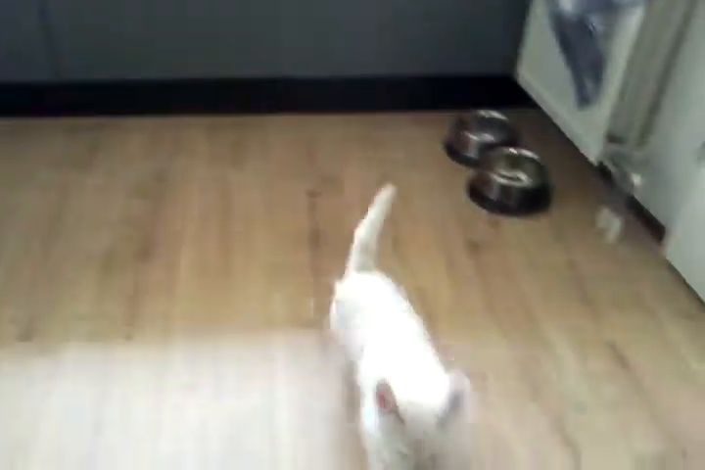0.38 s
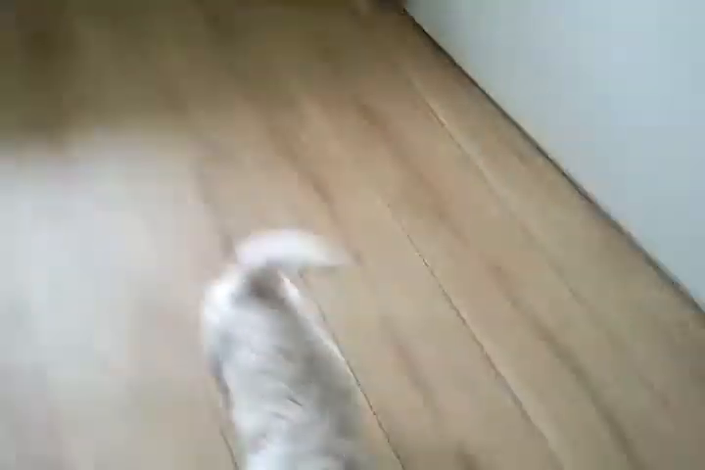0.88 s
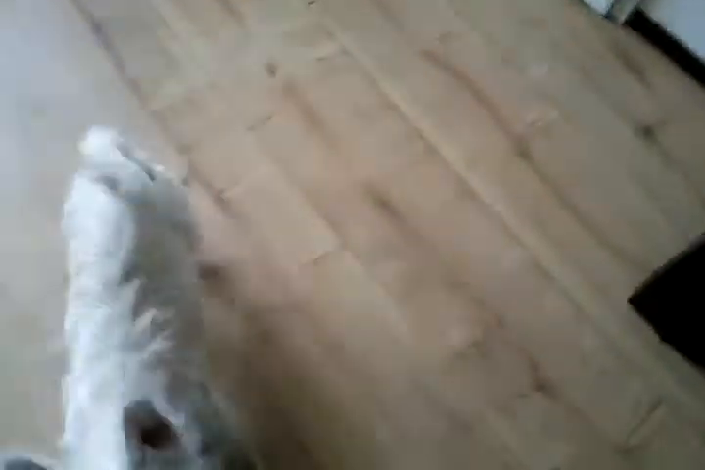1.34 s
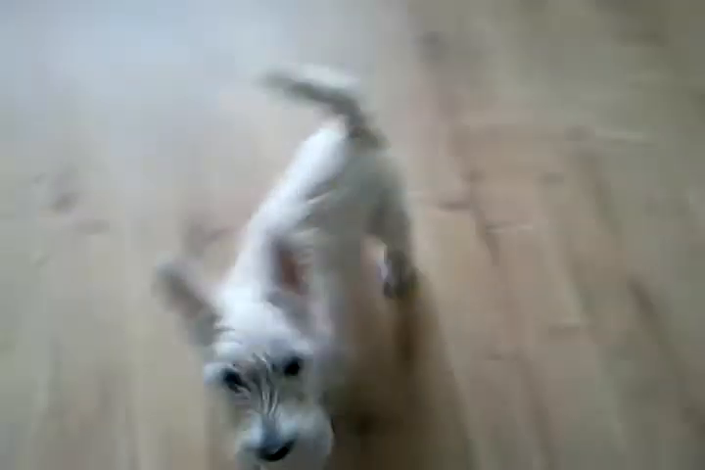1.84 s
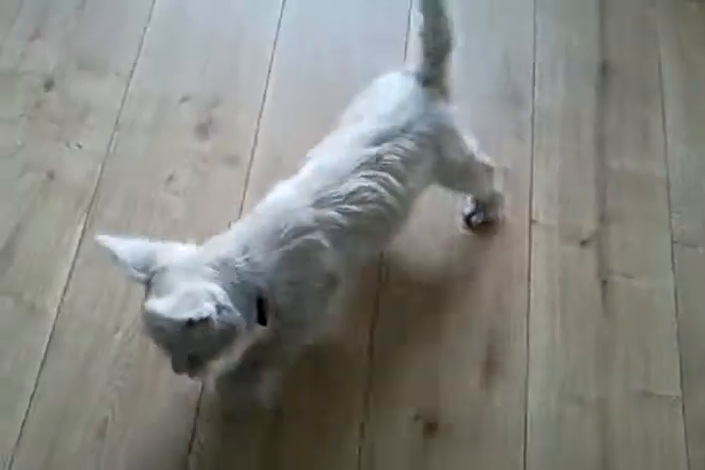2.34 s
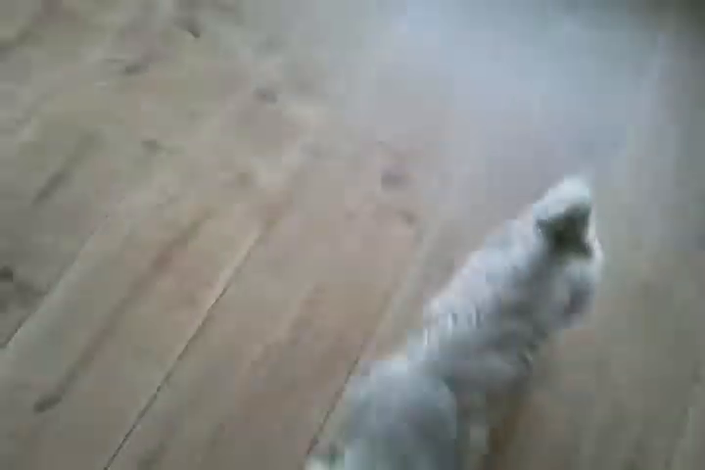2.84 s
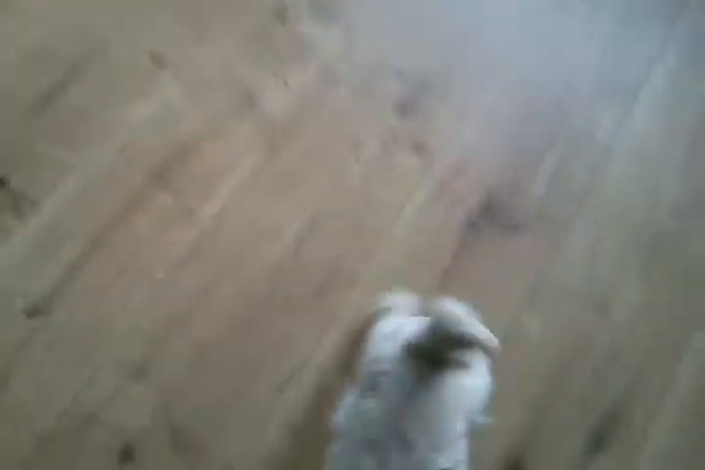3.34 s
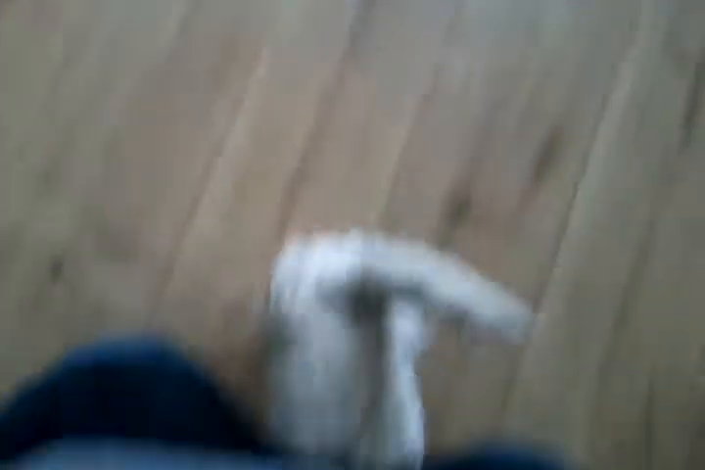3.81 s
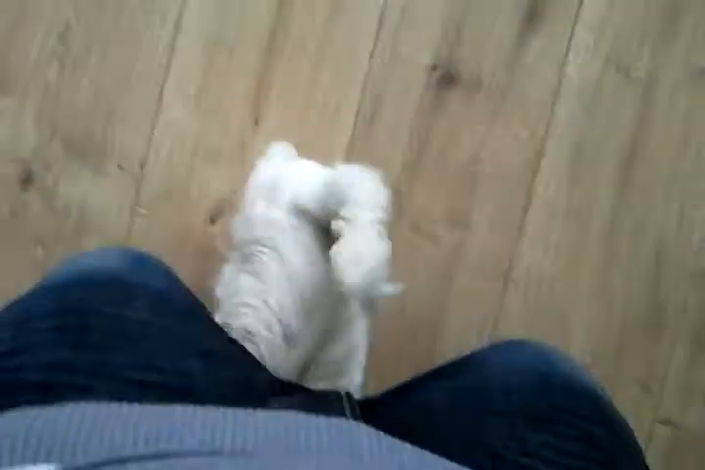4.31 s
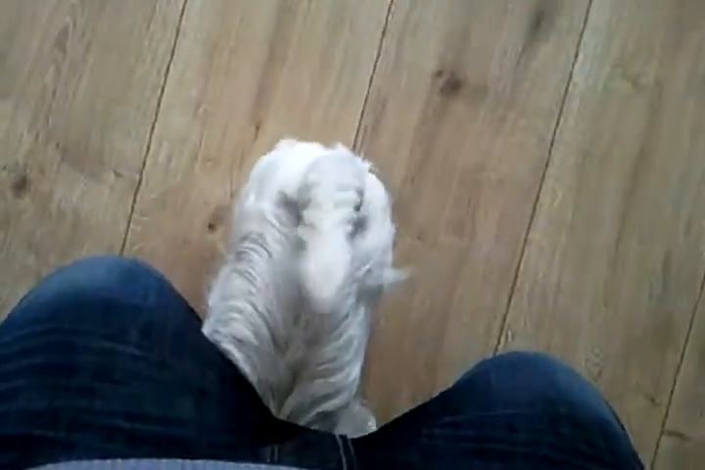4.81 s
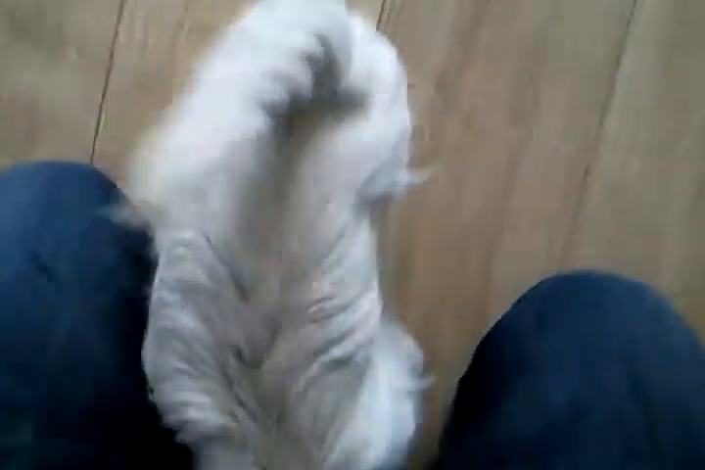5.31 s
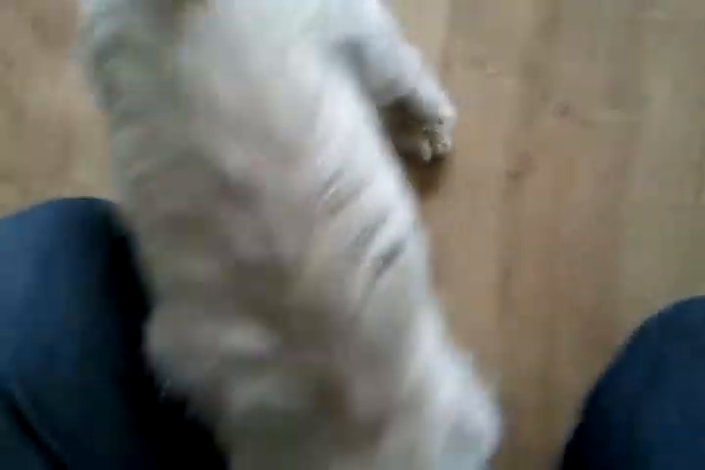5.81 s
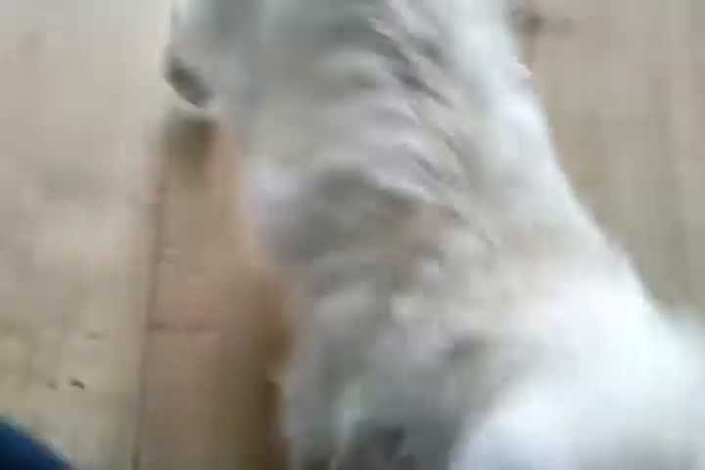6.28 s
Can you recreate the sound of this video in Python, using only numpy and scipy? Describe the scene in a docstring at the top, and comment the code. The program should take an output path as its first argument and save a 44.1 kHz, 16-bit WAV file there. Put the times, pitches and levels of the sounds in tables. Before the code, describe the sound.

Small dog moving on a hard wood floor: clicking claws, dull pad thuds, short woody knocks, and continuous soft rubbing of paws and fur. It starts with a rattling hollow knock and a tiny whimper, scurries busily, pauses, knocks and scuffles again, then thumps close under the microphone. The bare room rings briefly; low hiss throughout, no bright treble.

```python
"""A puppy on a hard wooden kitchen floor near a phone microphone, in mono under a soft steady hiss.
A hollow knock and scrapes open; others recur, over a continuous scuffing of fur and paws made of friction slips.
Paw falls run throughout: pads thud, boards knock, claws tick, as damped modes. Faint tones sound early and late,
one soft whimper near 0.4 s. From 4.8 s the paws fall right below the microphone. The bare room rings for about
half a second through sparse decaying reflections, and nothing lies above 9 kHz."""
import sys
import numpy as np
from scipy import signal
from scipy.fft import rfft, irfft
from scipy.io import wavfile
from scipy.ndimage import uniform_filter1d

SR = 44100
rng = np.random.default_rng(int(sys.argv[2]) if len(sys.argv) > 2 else 0)


def convert_level_to_amplitude(level_db):
    """Map a level in decibels to its linear amplitude factor."""
    exponent = np.asarray(level_db, float) / 20
    return 10 ** exponent


def persist_wave(psi):
    """Save psi, clipped to +-1, as 16-bit WAV."""
    counts = np.round(np.clip(psi, -1, 1) * 32767).astype(np.int16)
    wavfile.write(sys.argv[1], SR, np.atleast_2d(counts).T)


N = 293703

# spectrum of room tone and microphone noise, relative: freq_hz, density_db
HISS_SPECTRUM = [(18, -44.5), (30, 6), (150, -1), (330, 7), (590, -25.5), (840, -4), (1500, -8.5),
                 (2300, -5), (2800, -12), (6700, -4), (8700, -13)]
# how busily the puppy scuffs about: time_s, level_db
SCUFF_LEVELS = [(0.29, -54), (0.87, -57.5), (1.47, -64.5), (3.229, -63), (3.378, -48), (3.72, -48),
                (3.96, -53.5), (4.341, -47.5), (4.5, -58.5), (4.77, -55), (5.33, -54), (5.79, -57.5),
                (6.12, -57), (6.3, -47), (6.66, -54.5)]
# spectrum of one slip of a dragging paw, relative: freq_hz, gain_db
DRAG_SPECTRUM = [(120, -13), (250, -4), (380, -0.5), (600, -5.5), (850, -6.5), (1200, -10.5), (1800, -22)]
# spectrum of one slip of fur and cloth, relative: freq_hz, gain_db
RUSTLE_SPECTRUM = [(600, -36), (1400, -4), (2300, 3.5), (2900, -2.5), (4300, -2.5), (5300, -5),
                   (7000, -7.5), (9000, -37.5)]
# hard knocks: start_s, blow_db, low_modes_db, pitch_factor (by where it lands),
# rebound_delay_s, rebound_db (against the blow)
KNOCKS = [(.001, -10, -10, 0.93, 0.021, -13), (2.583, -14, -9, 0.96, .0101, -14),
          (3.1789, -15.5, -6.5, 0.88, 0.023, -7.5), (3.543, -19.5, -4, 0.92, 0.023, -2),
          (4.2738, -11, -4, 0.95, .018, -3), (4.5795, -16, -4.5, 0.94, 0.021, -4)]
# heavily damped modes of the knocked hollow thing, before the pitch factor: mode_hz, level_db, t60_s
HOLLOW_MODES = [(325, -11, 0.019), (494, 2, 0.029), (582, -2, 0.035), (950, -18, 0.0037), (1091, 8, 0.01),
                (1357, -1.5, 0.009), (1548, -6, 0.016), (1810, -8.5, 0.016), (3135, -14.5, 0.0096)]
# spectrum of a claw slipping on board, relative: freq_hz, gain_db
CRACK_SPECTRUM = [(400, -13.5), (1200, -13), (2250, 9.5), (2800, 6), (3400, 7), (4600, 4), (7000, 1.5),
                  (9000, -9)]
# scrapes and slides, short and long: start_s, length_s, level_db, brightest_hz,
# breadth_octaves (limited on use)
SCRAPES = [(.01, .17, -43, 5200, 1.0), (0.16, 0.14, -49.5, 5200, 1.0), (0.597, 0.31, -52, 4500, 1),
           (0.829, 0.11, -56.5, 937, 0.23), (1.126, 0.1, -52.5, 4970, 1), (1.948, 0.15, -57, 2410, 1),
           (2.861, 0.18, -61, 6080, 0.17), (3.414, 0.27, -53, 3410, 0.26), (3.76, 0.23, -49, 820, .27),
           (4.025, 0.2, -56.5, 4270, 0.27), (4.059, 0.18, -54.5, 2200, 0.32), (5, 0.083, -52.5, 1170, 0.17),
           (5.086, 0.18, -47, 500, 1), (5.333, 0.075, -52, 2910, 1), (5.391, 0.015, -49.5, 3280, 0.36),
           (6.168, 0.25, -52.5, 2370, 1), (6.398, .3, -60.5, 2220, 0.61)]
# paw falls: start_s, claw_tick_db, pad_thud_db, board_knock_db, board_hz
PAW_FALLS = [(0.253, -43, -27.5, -28, 714), (0.4888, -44, -48, -26.5, 735),
             (0.5606, -35.5, -33.5, -43.5, 221), (0.607, -51, -37, -24.5, 855), (0.806, -60, -56, -36, 413),
             (0.8781, -36, -41, -24.5, 937), (0.886, -54, -30.5, -42, 414), (0.922, -33, -35, -28.5, 845),
             (1.1284, -43, -40, -33, 860), (1.4057, -40.5, -41, -32, 730), (1.4334, -34, -33.5, -28, 990),
             (1.6372, -46.5, -59, -23.5, 736), (1.697, -42.5, -45, -37, 900),
             (1.7189, -32.5, -38.5, -28, 1020), (1.7605, -33.5, -29.5, -21, 652),
             (1.8118, -42, -59, -31.5, 940), (1.9494, -40.5, -40, -28, 880), (1.959, -34.5, -56, -37, 840),
             (1.9844, -29.5, -30, -23, 950), (1.9965, -35, -37, -28.5, 1040),
             (2.0268, -35.5, -31, -19.5, 800), (2.045, -52, -43, -28, 830), (2.1786, -66, -42, -31.5, 930),
             (2.2449, -33, -44, -33, 920), (2.2526, -22.5, -31.5, -18, 886), (2.3454, -60, -57, -26.5, 807),
             (2.9205, -40, -50, -32, 890), (2.9546, -41, -40, -29.5, 914), (3.601, -34.5, -29, -20, 950),
             (3.694, -33, -23, -21.5, 826), (3.751, -37, -28, -26.5, 570), (3.7745, -38.5, -32, -22, 800),
             (4.9014, -45, -48, -28.5, 740), (4.9265, -44, -55, -26, 746), (5.0205, -40.5, -23, -33, 298),
             (5.0682, -37.5, -24.5, -26, 840), (5.1765, -32, -20.5, -13, 980),
             (5.3262, -63, -24, -33, 1040), (5.4518, -30, -21.5, -20, 990),
             (5.5663, -36.5, -20.5, -26.5, 954), (5.575, -49, -25.5, -25.5, 1000),
             (5.8324, -40.5, -36, -33.5, 810), (5.8714, -41.5, -31.5, -38, 816),
             (6.2195, -35, -35, -26.5, 860), (6.337, -64, -48, -32, 397), (6.362, -59.5, -46, -38, 348),
             (6.392, -46, -49, -32, 402), (6.472, -40.5, -58, -38, 353)]
# modes of claw tip and lacquer, before detuning: mode_hz, level_db, t60_s
CLAW_MODES = [(1470, -13.5, 0.0025), (2117, 2.5, 0.0066), (3285, -9, 0.015)]
# faint wavering tones: start_s, length_s, mean_hz, level_db (rms at the top of the swell)
TONES = [(0.327, 0.12, 985, -52), (1.13, 0.46, 679, -67), (5.669, 0.64, 318, -61.5)]
# harmonics of the whimper: multiple_of_fundamental, level_db
WHIMPER_HARMONICS = [(1, 2), (2, -12), (4, -6), (5, -12), (7, -12)]
# decay of the room's reflections: freq_hz, t60_s
KITCHEN_DECAY = [(200, 0.38), (500, 0.52), (1400, 0.47), (4000, 0.54), (8000, 0.37)]
# near surfaces that answer first: delay_s, echo_db
WALL_ECHOES = [(.0042, -14), (.0146, -9.5)]

HISS_DB = -60
RUSTLE_DB = -2.5  # fur and cloth against the dragging paws
RATTLE_DB, REBOUND_RATTLE_DB, REBOUND_PITCH_FACTOR = -12.5, -26, 1.012
SETTLE_GAP_S, SETTLE_DB_PER_S = 0.024, -170  # rocking to rest after the rebound: mean gap, loss
UNDERFOOT_S = 4.8  # from here on the puppy is right below the microphone
PAD_FAR_HZ, PAD_NEAR_HZ = 353, 442  # before detuning; higher right below the microphone
SKID_FAR_DB, SKID_NEAR_DB = -1, -7.5  # skid against the tick
OVERTONE_RATIO, OVERTONE_DB = 1.563, -11  # the board's next mode
TOE_SPREAD_S, TOE_DB = 0.018, -7  # two more toes land within this time
WHIMPER_START_S, WHIMPER_LENGTH_S, WHIMPER_DB = 0.37, 0.17, -54
WHIMPER_HZ, WHIMPER_RISE_HZ_PER_S = 330, 160
BUILD_S = 0.0058  # the reflections take this long to gather
EARLY_DB, EARLY_S = 4, 0.053  # extra strength of the first reflections, and how soon it fades


def evened(x):
    """Normalization: scales a signal to rms 1."""
    return x / np.sqrt(np.mean(x ** 2) + 1e-20)


def read(points, hz):
    """Interpolation of a spectrum or decay table on a logarithmic frequency axis."""
    freq_hz, value = np.transpose(points)
    return np.interp(np.log(hz + 1), np.log(freq_hz + 1), value)


def add(mix, start_s, sound):
    """Superposition: adds a sound into the mix from its start time."""
    part = mix[max(round(start_s * SR), 0):][:len(sound)]
    part += sound[:len(part)]


def click(points):
    """Minimum phase: the causal pulse of a given spectrum, its energy early, scaled to peak 1."""
    log_gain = read(points, abs(np.fft.fftfreq(2048, 1 / SR))) * np.log(10) / 20
    response = np.exp(np.conj(signal.hilbert(log_gain)))
    pulse = np.fft.ifft(response).real[:1024]
    return pulse / abs(pulse).max()


def ring(hz, t60_s, rise_s=0.0014):
    """Damped resonance: one mode decays exponentially after a soft start."""
    t = np.arange(8192) / SR
    decay = convert_level_to_amplitude(-60 * t / t60_s)
    return np.sin(2 * np.pi * hz * t) * decay * (1 - np.exp(-t / rise_s))


def scratch(length_s, count, slip_per_s):
    """Stick-slip: a hard tip lands (count sure slips), then skids in a dying cluster of uneven slips."""
    size = round(length_s * SR)
    progress = np.arange(size) / (length_s * SR)
    happens = rng.random(size) < slip_per_s / SR
    slips = rng.standard_normal(size) * happens * np.exp(-3.0 * progress)
    slips[:count] = 1
    return signal.oaconvolve(slips, click(CRACK_SPECTRUM))


def kitchen(x, wet_db, count=4):
    """Reverberation: two near echoes and sparse reflections decaying by band, in a turning blend of tails."""
    length = SR * 3 // 4
    taps = np.zeros((count, length))
    # one reflection of random sign in every 20 samples
    at = np.arange(130, length - 20, 20) + rng.integers(0, 20, (count, (length - 131) // 20))
    np.put_along_axis(taps, at, rng.choice([-1., 1.], at.shape), 1)
    hz, t, z = signal.stft(taps, SR, nperseg=256)
    decay = convert_level_to_amplitude(-60 * t / read(KITCHEN_DECAY, hz)[:, None])
    tails = signal.istft(z * decay, SR, nperseg=256)[1]
    age_s = np.arange(tails.shape[1]) / SR
    tails *= 1 - np.exp(-(age_s / BUILD_S) ** 2)
    tails *= convert_level_to_amplitude(EARLY_DB * np.exp(-age_s / EARLY_S))
    # the sound crossfades from tail to tail every 0.31 s
    turn = np.arange(N) / SR / 0.31 - np.arange(count)[:, None]
    distance = abs((turn + count / 2) % count - count / 2)
    share = np.cos(np.pi / 2 * np.minimum(distance, 1))
    wet = signal.oaconvolve(x * share, tails / np.linalg.norm(tails[0]), axes=1)[:, :N].sum(0)
    heard = x + convert_level_to_amplitude(wet_db) * wet
    for delay_s, echo_db in WALL_ECHOES:
        add(heard, delay_s, convert_level_to_amplitude(echo_db) * x)
    return heard


def hiss():
    """Stationary noise: Gaussian noise filtered to the spectrum of room tone and microphone noise."""
    hz = np.fft.rfftfreq(N, 1 / SR)
    spectrum = rfft(rng.standard_normal(N)) * convert_level_to_amplitude(read(HISS_SPECTRUM, hz))
    return convert_level_to_amplitude(HISS_DB) * evened(irfft(spectrum, N))


def friction(spectrum, slip_per_s, spread_db):
    """Stick-slip friction: uneven random slips in clumps, each exciting the same pulse, in the room."""
    clumps_db = 3 * evened(uniform_filter1d(rng.standard_normal(N), 1200))
    slips = rng.standard_normal(N) * (rng.random(N) < slip_per_s / SR)
    slips *= convert_level_to_amplitude(spread_db * np.minimum(rng.exponential(1, N), 4) + clumps_db)
    return evened(kitchen(signal.oaconvolve(slips, click(spectrum))[:N], wet_db=-1.5))


def scuffs():
    """Friction of two surfaces: dragging paws and rustling fur follow one course of activity."""
    busy = convert_level_to_amplitude(np.interp(np.arange(N) / SR, *np.transpose(SCUFF_LEVELS)))
    drag = friction(DRAG_SPECTRUM, slip_per_s=1500, spread_db=2.2)
    rustle = friction(RUSTLE_SPECTRUM, slip_per_s=3000, spread_db=2.5)
    return busy * (drag + convert_level_to_amplitude(RUSTLE_DB) * rustle)


def knocks():
    """Impact excitation: each blow, its rebound and the rocking after it ring every mode and rattle."""
    out = np.zeros(N)
    spot_db = rng.standard_normal((len(KNOCKS), 5, len(HOLLOW_MODES)))  # each impact excites the modes unevenly
    gaps = rng.uniform(0.6, 1.4, (len(KNOCKS), 3))
    for knock, spots, gap in zip(KNOCKS, spot_db, gaps):
        start_s, blow_db, low_db, pitch, rebound_s, rebound_db = knock
        blows = [(start_s, blow_db, RATTLE_DB, pitch)]
        # the rebound itself, then three rocks
        for later_s in np.cumsum([0, *(SETTLE_GAP_S * gap)]):
            level_db = blow_db + rebound_db + SETTLE_DB_PER_S * later_s
            at_s = start_s + rebound_s + later_s
            blows.append((at_s, level_db, REBOUND_RATTLE_DB, pitch * REBOUND_PITCH_FACTOR))
        for (at_s, level_db, rattle_db, shift), spot_row in zip(blows, spots):
            rattle = scratch(0.024, count=0, slip_per_s=9000)
            add(out, at_s, convert_level_to_amplitude(level_db + rattle_db) * rattle)
            for (hz, mode_db, t60_s), spot in zip(HOLLOW_MODES, spot_row):
                gain = convert_level_to_amplitude(level_db + mode_db + spot + low_db * (hz < 700))
                add(out, at_s, gain * ring(hz * shift, t60_s, rise_s=0.00043))
    # a small thing radiates little bass
    out = signal.sosfilt(signal.butter(4, 255, "high", fs=SR, output="sos"), out)
    return kitchen(out, wet_db=2.0)


def scrapes():
    """Sustained friction: dense slips under a smooth stroke, with one resonance, narrow or broad by row."""
    out = np.zeros(N)
    for start_s, length_s, level_db, hz, octaves in SCRAPES:
        wide = 2 ** np.clip(octaves, 0.12, 1.2)
        colour = [(hz / wide ** 4, -30), (hz / wide, -8), (hz, 0), (hz * wide, -8), (hz * wide ** 4, -28)]
        size = round(length_s * SR)
        slips = rng.standard_normal(size) * (rng.random(size) < 3000 / SR)
        slips *= signal.windows.tukey(size, 0.6)
        add(out, start_s, convert_level_to_amplitude(level_db) * evened(signal.oaconvolve(slips, click(colour))))
    return kitchen(out, wet_db=-9.0)


def paws():
    """Modal impact: a paw fall is a claw tick and skid, a dull pad thud and a short knock of the board."""
    far, near = np.zeros((2, N))
    detune = rng.uniform(0.94, 1.06, (len(PAW_FALLS), len(CLAW_MODES) + 1))
    toes = rng.random((len(PAW_FALLS), 2, 2))
    for paw_fall, (pad_shift, *claw_shifts), late_toes in zip(PAW_FALLS, detune, toes):
        start_s, claw_db, pad_db, board_db, board_hz = paw_fall
        out, skid_db, pad_hz = far, SKID_FAR_DB, PAD_FAR_HZ
        if start_s > UNDERFOOT_S:
            out, skid_db, pad_hz = near, SKID_NEAR_DB, PAD_NEAR_HZ
        skid = scratch(0.023, count=1, slip_per_s=1900)
        add(out, start_s, convert_level_to_amplitude(claw_db + skid_db) * skid)
        for (hz, mode_db, t60_s), shift in zip(CLAW_MODES, claw_shifts):
            add(out, start_s, convert_level_to_amplitude(claw_db + mode_db) * ring(hz * shift, t60_s, rise_s=0.0002))
        add(out, start_s, convert_level_to_amplitude(pad_db) * ring(pad_hz * pad_shift, 0.021))
        # the board always decays over the same number of cycles
        add(out, start_s, convert_level_to_amplitude(board_db) * ring(board_hz, 12.9 / board_hz, rise_s=0.0017))
        for delay, place in late_toes:
            toe = ring(board_hz * (1 + 0.59 * (place - 0.5)), 0.016)
            add(out, start_s + TOE_SPREAD_S * delay, convert_level_to_amplitude(board_db + TOE_DB) * toe)
        add(out, start_s, convert_level_to_amplitude(board_db + OVERTONE_DB) * ring(board_hz * OVERTONE_RATIO, 0.01))
    # less room up close
    return kitchen(far, wet_db=-3.5) + kitchen(near, wet_db=-5)


def tones():
    """Frequency modulation: soft sinusoids swell and fade on a slowly wavering pitch."""
    out = np.zeros(N)
    for start_s, length_s, hz, level_db in TONES:
        size = round(length_s * SR)
        waver = 0.0064 * evened(uniform_filter1d(rng.standard_normal(size), 1500))
        tone = np.sin(2 * np.pi * np.cumsum(hz * (1 + waver)) / SR)
        add(out, start_s, convert_level_to_amplitude(level_db) * np.sqrt(2) * np.hanning(size) * tone)
    return out


def whimper():
    """Harmonic series: a few partials on an unsteady, rising fundamental swell, hold and fade."""
    out = np.zeros(N)
    t = np.arange(0, WHIMPER_LENGTH_S, 1 / SR)
    waver = 0.005 * evened(uniform_filter1d(rng.standard_normal(len(t)), 600))
    turns = np.cumsum((WHIMPER_HZ + WHIMPER_RISE_HZ_PER_S * t) * (1 + waver)) / SR
    voice = sum(convert_level_to_amplitude(db) * np.sin(2 * np.pi * k * turns) for k, db in WHIMPER_HARMONICS)
    # loudness wavers along with the pitch
    envelope = signal.windows.tukey(len(t), 0.5) * convert_level_to_amplitude(300 * waver)
    add(out, WHIMPER_START_S, convert_level_to_amplitude(WHIMPER_DB) * envelope * voice)
    return kitchen(out, wet_db=-28.0)


def scene():
    """Superposition: all sources add at one microphone, given to two equal channels."""
    mix = hiss() + scuffs() + knocks() + scrapes() + paws() + tones() + whimper()
    return np.tile(mix, (2, 1))


def top_cut(x):
    """Nothing passes above the cut-off."""
    return signal.sosfilt(signal.butter(12, 8590, fs=SR, output="sos"), x)


def record(dry):
    """Mono pickup: the finished mix is the same in both channels."""
    return top_cut(dry)


dry = scene()
out = record(dry)
persist_wave(out)
```